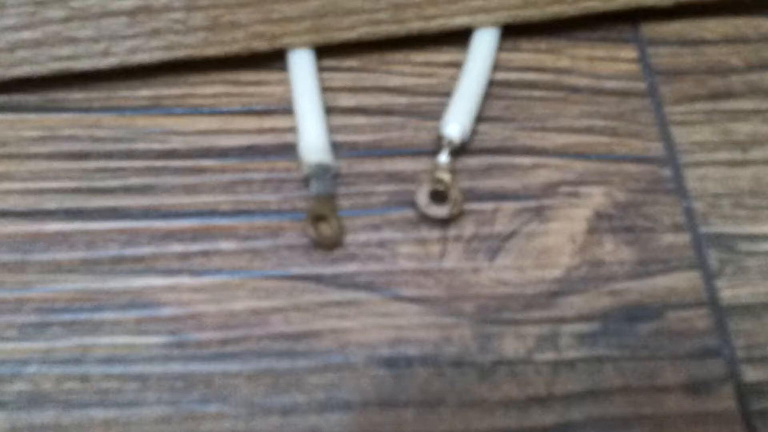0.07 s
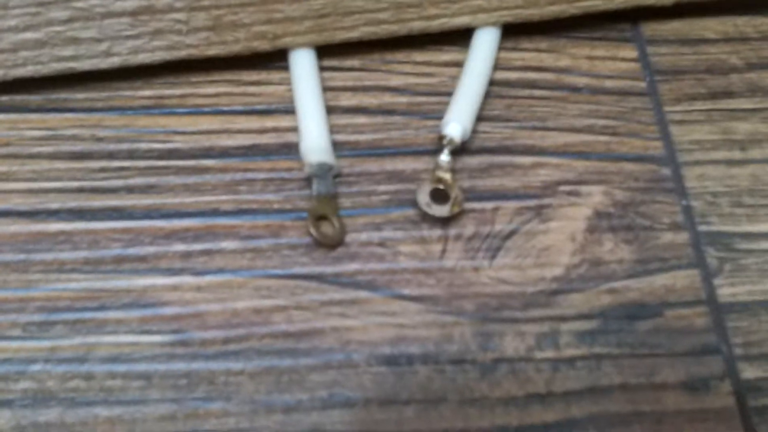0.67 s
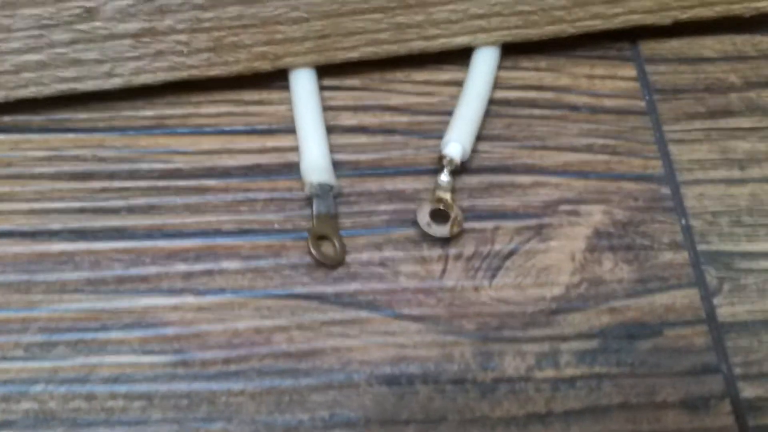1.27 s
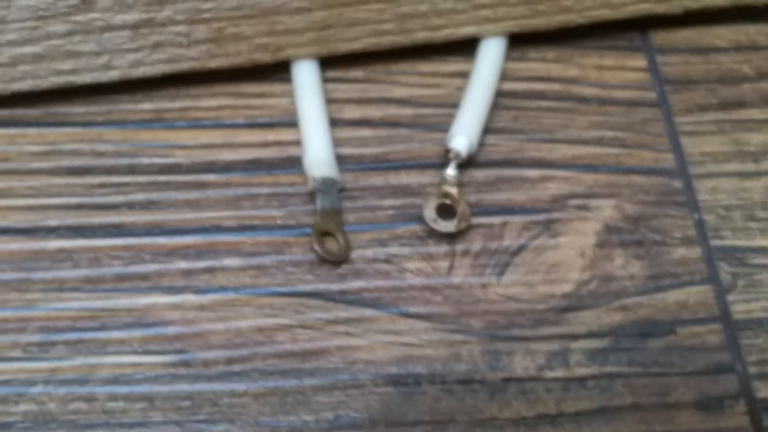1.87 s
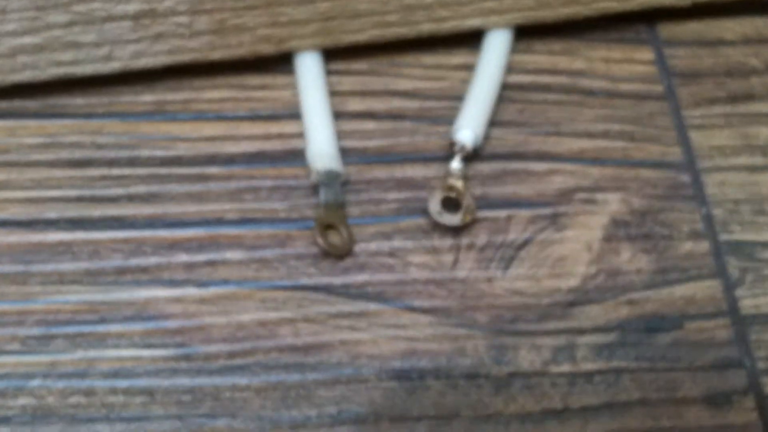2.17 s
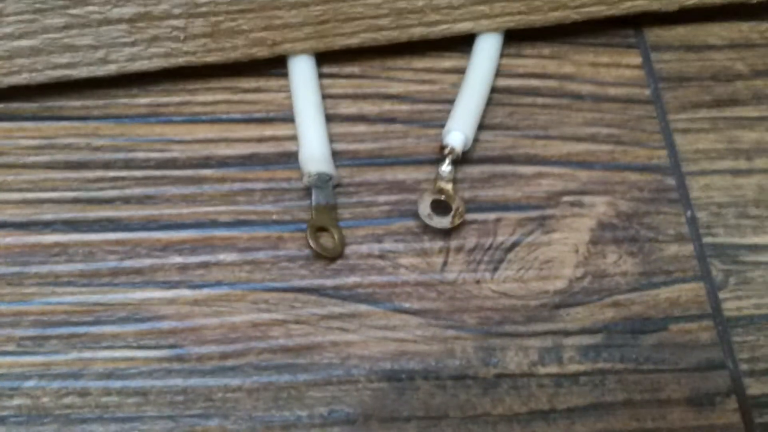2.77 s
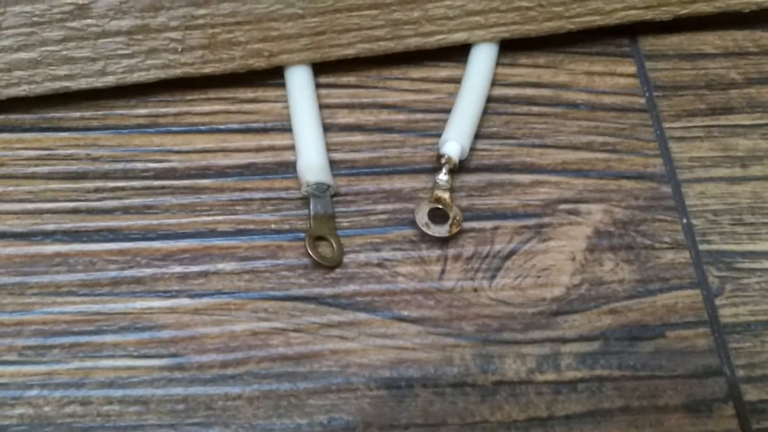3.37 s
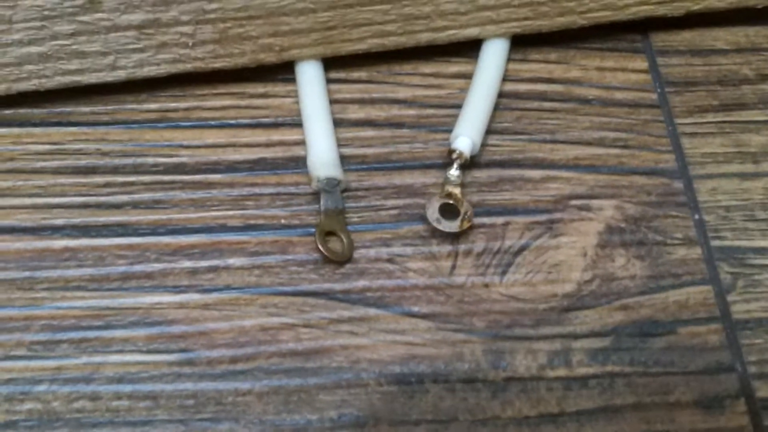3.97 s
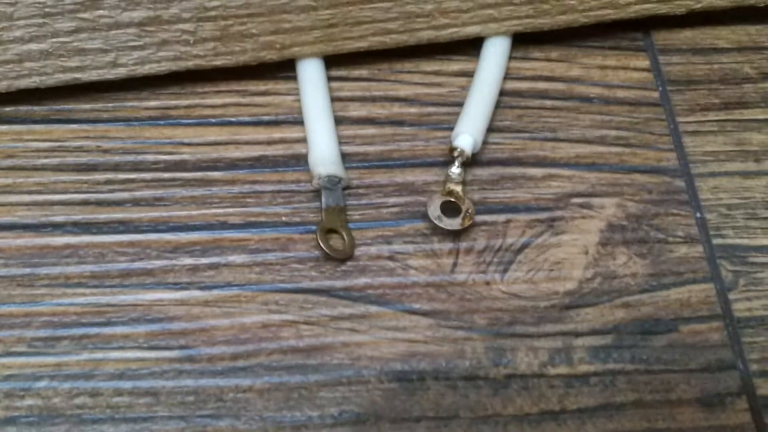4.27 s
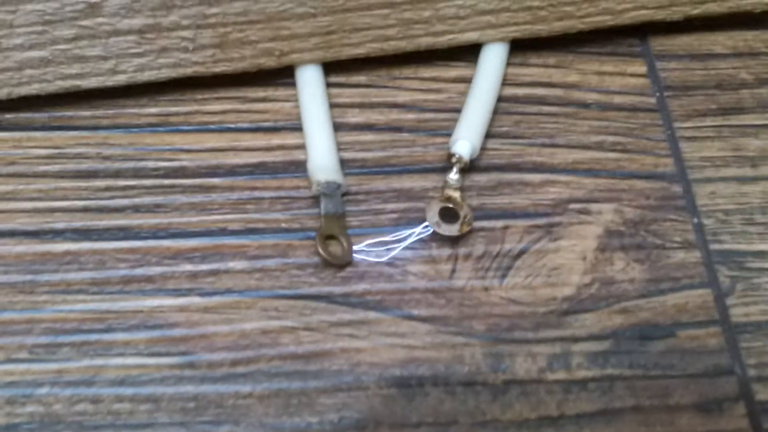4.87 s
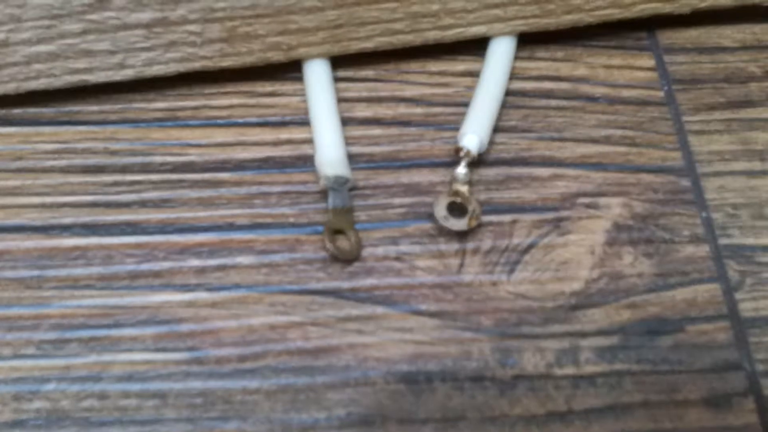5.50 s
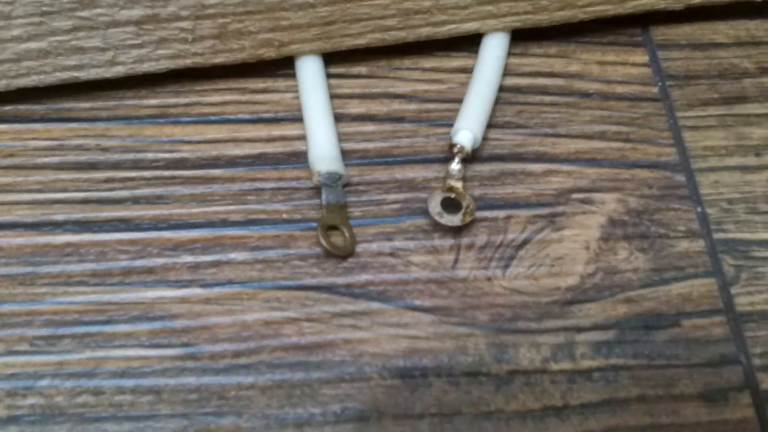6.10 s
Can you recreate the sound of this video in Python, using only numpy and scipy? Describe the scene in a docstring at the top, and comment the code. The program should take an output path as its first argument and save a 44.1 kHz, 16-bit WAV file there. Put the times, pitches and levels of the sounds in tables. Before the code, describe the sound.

In a quiet room, an electric discharge cracks across a small gap five times at a steady pace, a little slower than once a second. The snaps are bright and harsh, some with a low thump, and each dies away in a short echo with a thin metallic ring. The microphone is close and distorts slightly on the peaks. Between snaps there is only low rumble, hiss and an occasional soft handling knock.

```python
"""Sharp electric snaps, about one every 1.24 s, each leaving the room and nearby metal ringing.
A high-voltage supply fires across the gap between two ring terminals on a wooden floor: a snap is about a
dozen sparks some 2.5 ms apart, each a pressure pulse with close echoes. They overload two microphones,
whose limiters duck and let the room swell back. Soft handling bumps, rumble and faint hiss lie below."""
import sys
import numpy as np
from scipy import signal
from scipy.fft import rfft, irfft
from scipy.io import wavfile
from scipy.ndimage import uniform_filter1d, minimum_filter1d

SR = 44100
rng = np.random.default_rng(int(sys.argv[2]) if len(sys.argv) > 2 else 0)


def file_out(sig):
    """Save sig as 16-bit WAV at sys.argv[1]."""
    # one column per channel
    cols = np.atleast_2d(sig).T
    # limit, then scale
    lim = np.clip(cols, -1, 1)
    pcm = np.round(lim * 32767).astype(np.int16)
    wavfile.write(sys.argv[1], SR, pcm)


N = 275184

# Discharges of the supply; of the first only the ring is heard:
# start_s, min_length_s, spark_count, level_db, thump_db
BURSTS = [(-.159, 0.035, 13, 10.5, -3), (1.0792, 0.035, 13, 14.5, 16), (2.3224, 0.032, 11, 14, 3),
          (3.561, 0.033, 13, 13.5, 13), (4.8002, .0455, 12, 14, 18), (6.0292, 0.035, 13, 14, 7.5)]

def sparks(bursts, spread_db=0.26):
    """Dielectric breakdown: each spark is a pressure impulse, convolved with its path to a microphone."""
    out = np.zeros((2, SR + N + 2 * SR))   # with lead-in and space for the last tail
    for times, (_, _, _, level_db, _) in zip(bursts, BURSTS):
        at = SR + np.round(times * SR).astype(int)
        pulses = np.zeros(at[-1] - at[0] + 1)
        pulses[at - at[0]] = from_db(level_db + spread_db * rng.standard_normal(len(at)))
        # the hand-held microphones drift, so each burst meets a slightly different room
        left = spark_response(0, lag_ms=0.21, scatter_db=-30, scatter_t60=0.066)
        right = spark_response(1, lag_ms=0, scatter_db=-29, scatter_t60=0.062)
        snap = signal.fftconvolve(pulses[None], [left, right], axes=1)
        out[:, at[0]:at[0] + snap.shape[1]] += snap
    return out[:, SR:SR + N]


def spark_times(recharge_ms=2.48, cold_ms=0.75, jitter_ms=0.11, warm_up_sparks=1.1, run_down_sparks=0.9):
    """Relaxation oscillation: the gap recharges and fires again. Gives each burst's spark times in s."""
    bursts, shape = [], (len(BURSTS), 32)
    jitters, chances = rng.standard_normal(shape), rng.random(shape)
    for (start_s, length_s, count, *_), jitter, chance in zip(BURSTS, jitters, chances):
        k = np.arange(round(count) - 1)
        cold_air = np.exp(-k / warm_up_sparks)   # slower at first, while the air is cold
        waits_s = (recharge_ms + cold_ms * cold_air + jitter_ms * jitter[k]) / 1000
        # spare time goes to the last sparks, as the supply runs down, and to a few late ones
        spare_s = max(length_s - waits_s.sum(), 0)
        late = chance[k] < 0.12
        faltering = np.exp(-k[::-1] / run_down_sparks) + 0.38 * late
        waits_s += spare_s * faltering / faltering.sum()
        bursts.append(start_s + np.r_[0, np.cumsum(waits_s)])
    return bursts


# Spectrum of a spark through each microphone port; the right faces the gap: frequency_hz, level_db
LEFT_PORT = [(60, -40), (560, -12.5), (800, -3.5), (1000, -6.5), (1300, -3), (1580, 3.5), (2100, -2),
             (2700, -11), (4800, -3), (5500, 6), (6900, 11), (8000, 5), (10000, -7), (12500, 4),
             (14500, 0.5)]
RIGHT_PORT = [(60, -10), (560, -3.5), (800, -3.5), (1000, -8), (1700, -3), (2500, -4), (3400, 0), (6400, 1),
              (7300, 11.5), (7800, 4.5), (8700, 9), (11500, 10), (14500, 10), (17000, -7.5)]
# Early reflections from the floor and things close by: delay_ms, gain_db
LEFT_ECHOES = [(0.564, -14), (2.15, -9.5), (2.462, -13), (3.599, -14.5)]
RIGHT_ECHOES = [(.515, -14.5), (.656, -13), (.85, -22), (2.821, -21.5), (3.195, -18.5)]

def spark_response(channel, lag_ms, scatter_db, scatter_t60, scatter_hz=10000, size=65536):
    """Superposition: direct pulse, echoes, scatter from furniture and room ring add at a microphone."""
    port, echoes = [(LEFT_PORT, LEFT_ECHOES), (RIGHT_PORT, RIGHT_ECHOES)][channel]
    t, hz = np.arange(size) / SR, np.fft.rfftfreq(size, 1 / SR)
    phase_per_ms = -2j * np.pi * hz / 1000
    paths = 1 + sum(from_db(db) * np.exp(phase_per_ms * ms) for ms, db in echoes)
    envelope = decay(t, scatter_t60) * (1 - np.exp(-t / 0.0012))
    scatter = from_db(scatter_db) * rng.standard_normal(size) * envelope
    scatter = signal.sosfilt(signal.butter(2, scatter_hz, fs=SR, output="sos"), scatter)
    field = (paths + rfft(scatter + reverberation(channel, size))) * np.exp(phase_per_ms * lag_ms)
    return irfft(field * minimum_phase(port, size))[:SR]


# The room's ring after a spark, by band: frequency_hz, left_db, right_db, t60_s
ROOM_BANDS = [(99.7, -67.5, -79, 0.63), (395, -46.5, -55.5, 1), (774, -56, -59, 0.57),
              (1080, -58.5, -57, 1), (1600, -55.5, -54.5, .52), (2850, -48, -53.5, 0.6),
              (3446, -42.5, -57.5, 0.5), (4100, -43, -47.5, 0.46), (4250, -38.5, -52, 0.38),
              (4950, -41, -51.5, 0.41), (5405, -54.5, -52.5, 0.47), (6700, -48, -49.5, 0.37),
              (9180, -45, -53.5, 0.34), (13500, -53, -60, 0.21)]

def reverberation(channel, size, late_db=-21, late_t60=1.0, build_s=0.0053):
    """Diffuse field: noise builds up, then decays exponentially band by band over a faint late tail."""
    t, hz = np.arange(size) / SR, np.fft.rfftfreq(size, 1 / SR)
    centres_hz = np.array(ROOM_BANDS)[:, 0]
    white, out = rfft(rng.standard_normal(size)), 0
    for (_, *levels_db, t60), weights in zip(ROOM_BANDS, np.eye(len(ROOM_BANDS))):
        band = irfft(white * at_hz(np.c_[centres_hz, weights], hz))
        envelope = decay(t, t60) + from_db(late_db) * decay(t, late_t60)
        out = out + band * from_db(levels_db[channel]) * envelope
    return out * (1 - np.exp(-t / build_s))


def thumps(bursts, left_db=-22, top_hz=480, fade_t60=0.15):
    """Low-passed impulses: sparks thump erratically, most early in a burst and at the facing port."""
    pushes = np.zeros(N)
    for times, (start_s, *_, thump_db) in zip(bursts, BURSTS):
        times = times[times > 0]
        strength = from_db(thump_db) * decay(times - start_s, fade_t60)
        pushes[np.round(times * SR).astype(int)] = strength * rng.standard_normal(len(times))
    low_pass = signal.butter(2, top_hz, fs=SR, output="sos")
    return signal.sosfilt(low_pass, pushes + 1e-18) * from_db([[left_db], [0]])


# Natural modes of the nearby metal: pitch_hz, level_db, t60_s
METAL_MODES = [(3880, -57.5, 0.47), (4900, -55, 0.55), (5000, -59, 0.5), (6439, -69, 1.1),
               (6850, -69.5, 1.3), (7030, -66.5, 1.4), (7465, -71.5, 1.1)]

def ringing_metal(bursts):
    """Sympathetic vibration: the sparks excite lightly damped modes in nearby metal."""
    times, drive = np.concatenate(bursts), np.zeros((2, N))
    at = np.round(times[times > 0] * SR).astype(int)
    drive[:, at] = rng.standard_normal((len(at), 2)).T   # each spark couples differently
    return sum(from_db(db) * resonator(drive, hz, t60) for hz, db, t60 in METAL_MODES)


# Soft knocks of handling: start_s, level_db
BUMPS = [(0.513, -51), (0.531, -51.5), (.569, -55.5), (1.565, -59.5), (2.837, -70), (2.896, -59),
         (4.516, -61)]
# Modes of a bump, dull wood and a trace of metal: pitch_hz, gain_db, t60_s
BUMP_MODES = [(204, -16, 0.15), (230.4, 3.5, 0.095), (520, -1, 0.04), (4330, -35, 2.6), (4387, -29, 2.2),
              (4420, -34.5, 1.8), (4570, -32, 1.2), (5260, -35.5, 1.2)]

def bumps(scuff_db=-17, scuff_t60=0.36):
    """Impact excitation: each knock rings damped wood and faint metal, with a short scuff of noise."""
    knocks = np.zeros(N)
    for start_s, level_db in BUMPS:
        knocks[round(start_s * SR)] = from_db(level_db)
    body = sum(from_db(db) * resonator(knocks, hz, t60) for hz, db, t60 in BUMP_MODES)
    scuff = rng.standard_normal((2, SR // 2)) * decay(np.arange(SR // 2) / SR, scuff_t60)
    return body + from_db(scuff_db) * signal.fftconvolve(knocks[None], scuff, axes=1)[:, :N]


# Spectrum of the background noise: frequency_hz, relative_density_db
NOISE_SPECTRUM = [(15, -45), (25, -18), (92, -4), (210, -7.5), (314, -10), (409, -14), (480, -12),
                  (716, -16), (1920, -21.5), (4040, -24.5), (4490, -24.5), (4870, -26.5), (14500, -25.5)]
# Its slow drift: time_s, level_db, treble_boost_db
NOISE_LEVELS = [(0, -57, 2.5), (.9, -58.5, 1), (1.998, -58.5, 0.5), (3.198, -59, 0.5), (4.399, -59, 0.5),
                (5.702, -59.5, 0)]

def rumble_and_hiss(shared_power=0.1, treble_hz=2500):
    """Partly coherent noise: room rumble and microphone hiss, a little of it common to both sides."""
    hz, t = np.fft.rfftfreq(N, 1 / SR), np.arange(N) / SR
    white = rng.standard_normal((3, N))
    stereo = np.sqrt(1 - shared_power) * white[:2] + np.sqrt(shared_power) * white[2]
    noise = irfft(rfft(stereo) * from_db(at_hz(NOISE_SPECTRUM, hz)), N)
    noise /= noise.std()
    time_s, level_db, boost_db = np.transpose(NOISE_LEVELS)
    treble = signal.sosfilt(signal.butter(1, treble_hz, "high", fs=SR, output="sos"), noise)
    extra_hiss = (from_db(np.interp(t, time_s, boost_db)) - 1) * treble
    return from_db(np.interp(t, time_s, level_db)) * (noise + extra_hiss)


def limiter(x, ceiling_db, hold_s, release_db_per_s, bass_hz=700, bass_ratio=1.7, bass_attack_s=0.025):
    """Automatic gain control: overload cuts the gain; the bass sinks further and comes back later."""
    power = np.maximum(uniform_filter1d(x * x, 16), 1e-12)
    over_db = np.maximum(10 * np.log10(power) - ceiling_db, 0)
    bass = signal.sosfiltfilt(signal.butter(2, bass_hz, fs=SR, output="sos"), x)
    bass_target = ducking(bass_ratio * over_db, hold_s=0.035, release_db_per_s=480)
    pole = np.exp(-1 / (bass_attack_s * SR))
    bass_db = signal.lfilter([1 - pole], [1, -pole], 20 * np.log10(bass_target))
    return (x - bass + bass * from_db(bass_db)) * ducking(over_db, hold_s, release_db_per_s)


def ducking(over_db, hold_s, release_db_per_s, ramp_samples=180):
    """Look-ahead limiting: the gain drops just before an overload, holds, then climbs back."""
    hold = int(hold_s * SR) | 1
    held_db = -minimum_filter1d(-over_db, hold, origin=hold // 2)
    release_db = release_db_per_s * np.arange(N) / SR
    cut_db = np.maximum.accumulate(held_db + release_db) - release_db
    return from_db(uniform_filter1d(minimum_filter1d(-cut_db, ramp_samples), ramp_samples))


def resonator(drive, hz, t60):
    """Damped harmonic oscillator: a unit impulse starts a decaying sine of height 1."""
    r, w = from_db(-60 / (t60 * SR)), 2 * np.pi * hz / SR
    return signal.lfilter([0, np.sin(w)], [1, -2 * r * np.cos(w), r * r], drive + 1e-18)


def minimum_phase(spectrum, size):
    """Causality: a frequency response of the given magnitude in which nothing precedes the impulse."""
    magnitude = from_db(at_hz(spectrum, np.fft.rfftfreq(size, 1 / SR)))
    cepstrum = irfft(np.log(magnitude))
    cepstrum[1:size // 2] *= 2
    cepstrum[size // 2 + 1:] = 0
    return np.exp(rfft(cepstrum))


def decay(t, t60):
    """Exponential decay of 60 dB in t60 seconds."""
    return np.exp(-np.log(1000) * t / t60)


def at_hz(points, hz):
    """Linear interpolation on a log-frequency axis."""
    points_hz, values = np.transpose(points)
    return np.interp(np.log(np.maximum(hz, 1)), np.log(points_hz), values)


def from_db(db):
    """Decibels to amplitude ratio."""
    return 10 ** (np.asarray(db) / 20)


def scene():
    """Superposition: the sparks and all they excite add to the quiet background."""
    bursts = spark_times()
    return sparks(bursts) + thumps(bursts) + ringing_metal(bursts) + bumps() + rumble_and_hiss()


def record(dry, opening_s=0.114, fade_in_s=0.0019, cutoff_hz=14650):
    """Overload: once the input opens, each side is limited, clipped and low-passed."""
    dry = dry * np.clip((np.arange(N) / SR - opening_s) / fade_in_s, 0, 1)
    left = limiter(dry[0], ceiling_db=-6.5, hold_s=0.0085, release_db_per_s=457)
    right = limiter(dry[1], ceiling_db=-2.5, hold_s=0.0077, release_db_per_s=408.5)
    low_pass = signal.firwin(161, cutoff_hz, fs=SR)
    return signal.fftconvolve(np.clip([left, right], -1, 1), low_pass[None], mode="same", axes=1)


dry = scene()
out = record(dry)
file_out(out)
```